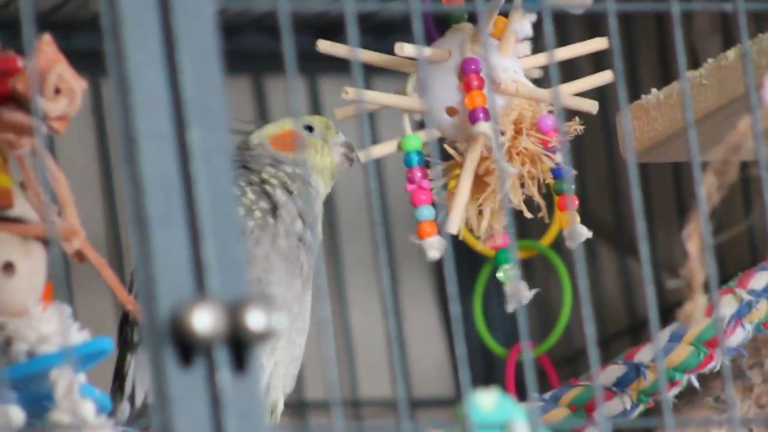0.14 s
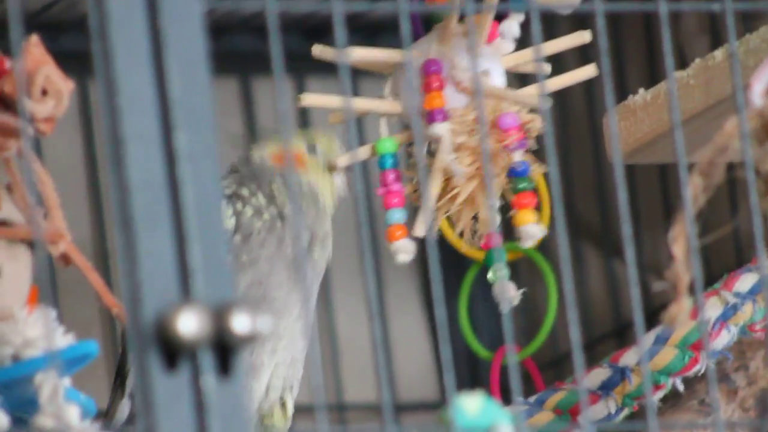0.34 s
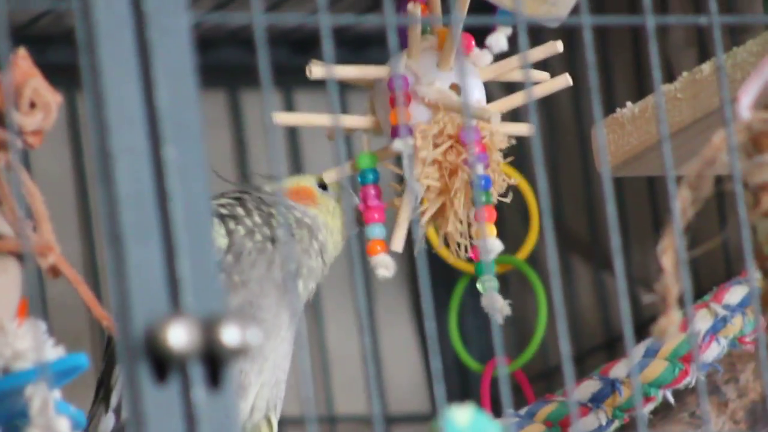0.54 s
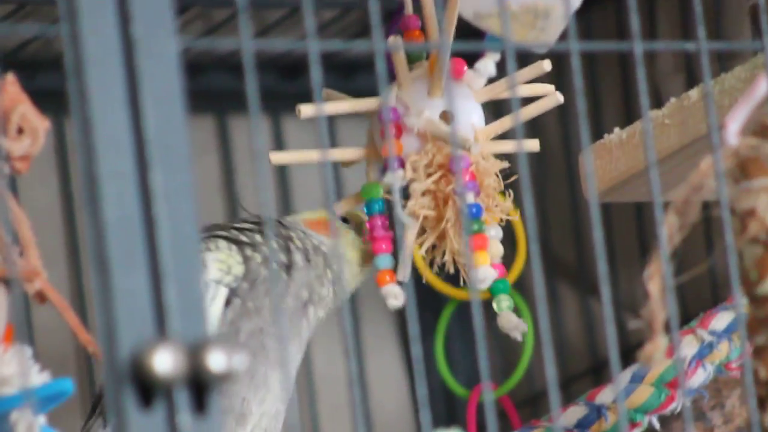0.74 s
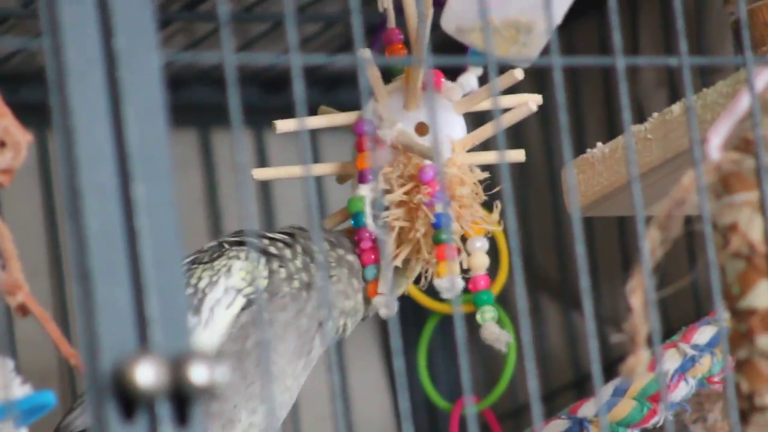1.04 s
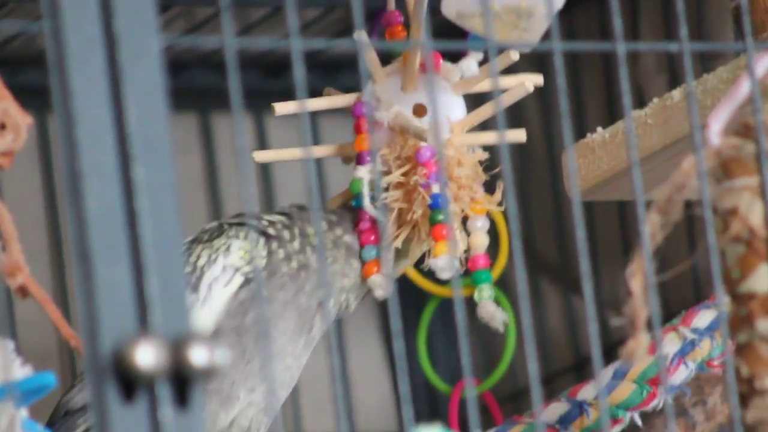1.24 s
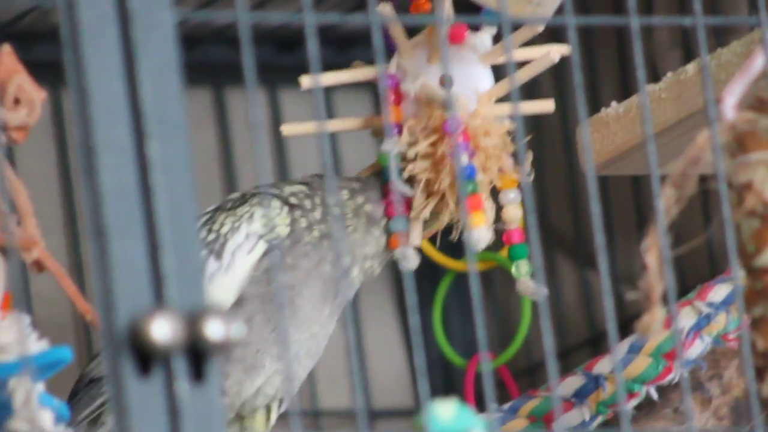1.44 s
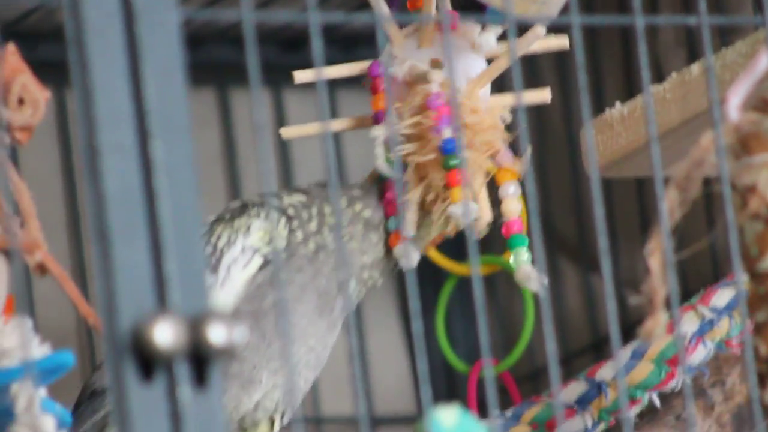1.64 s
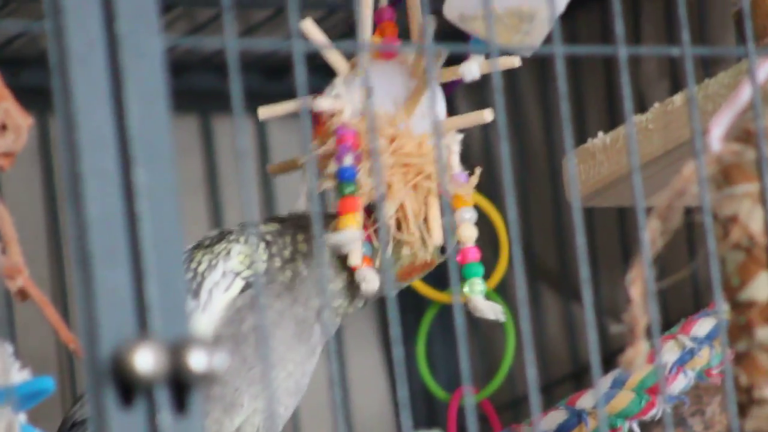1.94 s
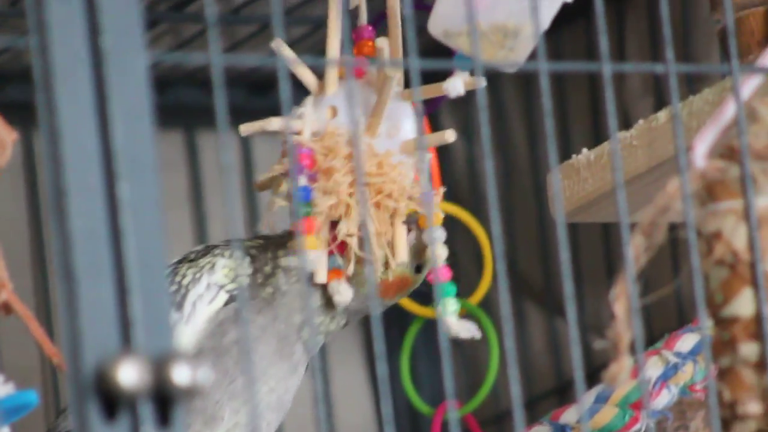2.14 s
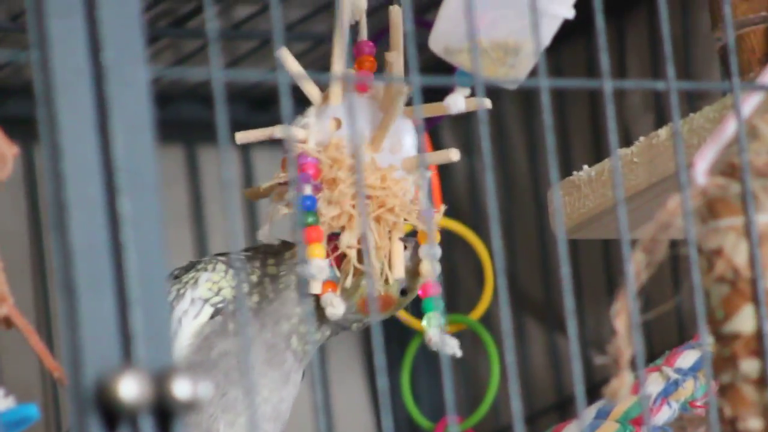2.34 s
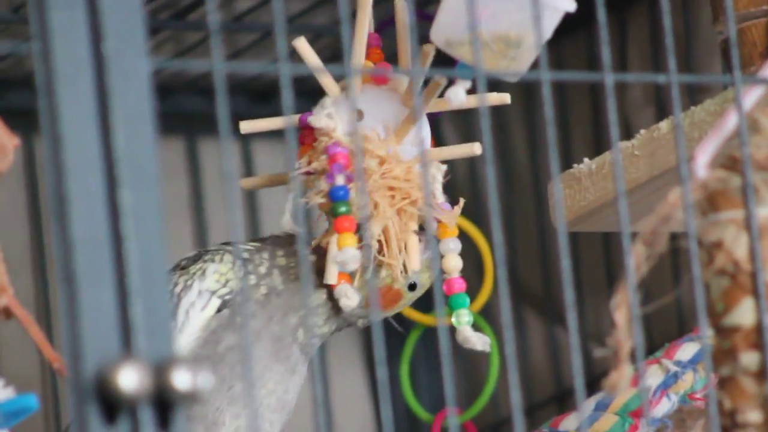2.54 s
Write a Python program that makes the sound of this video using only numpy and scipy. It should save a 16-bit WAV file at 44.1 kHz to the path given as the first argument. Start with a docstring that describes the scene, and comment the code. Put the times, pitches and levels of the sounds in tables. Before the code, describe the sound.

A cockatiel chirps loudly and close in a furnished room: several buzzy notes flip into bright rising whistles, with pauses between, then one thinner, higher chirp. A low steady fan hum with a faint whine stays underneath.

```python
"""Cockatiel in a furnished room

A cockatiel chirps: most chirps have a few hoarse, buzzy notes and slide into a whistle.
The whistles are tones with two overtones; the hoarse notes are jittery stacks of partials, filtered.
The room smears both into short tails of fading noise. Behind them an appliance fan hums as
shaped noise with a thin whine, and a screen whistles faintly; both are gently wandering sines."""
import sys
import numpy as np
from scipy import signal
from scipy.fft import rfft, irfft
from scipy.io import wavfile

SR = 44100
rng = np.random.default_rng(int(sys.argv[2]) if len(sys.argv) > 2 else 0)


def transcribe(signal):
    """Save signal, clipped to [-1, 1], as a 16-bit WAV file at the path in sys.argv[1]."""
    frames = np.atleast_2d(signal).T
    limited = np.clip(frames, -1, 1)
    pcm = np.round(limited * 32767).astype(np.int16)
    wavfile.write(sys.argv[1], SR, pcm)


N = 119070


def from_db(db):
    """Turns decibels into a plain gain."""
    return 10 ** (np.asarray(db) / 20)


def at_hz(points, hz):
    """Reads a table between its points, along a log-frequency axis."""
    table = np.array(points)
    return np.interp(np.log(hz + 1), np.log(table[:, 0]), table[:, 1])


def drift(rate_hz, size):
    """Slow random wander with a spread of 1: noise smoothed by a two-pole low-pass."""
    r = np.exp(-2 * np.pi * rate_hz / SR)
    slow = signal.lfilter([1], [1, -2 * r, r * r], rng.standard_normal(size))
    return (slow - slow.mean()) / slow.std()


def band_pass(x, low_hz, high_hz):
    """Keeps only the sound between two frequencies."""
    return signal.sosfilt(signal.butter(2, [low_hz, high_hz], "band", fs=SR, output="sos"), x)


# Spectrum of the fan's air noise, before its overall level is set: f/Hz, relative level per Hz/dB
FAN_SPECTRUM = [(21, -61), (35, -33), (135, -7), (213, -8), (283, 0.5), (364, -3.5), (436, -5), (782, -9.5),
                (889, -9), (1010, -14), (1300, -9.5), (2400, -14.5), (2870, -15.5), (5420, -22.5),
                (12200, -46.5), (15400, -51)]
# Duct resonances that lift this spectrum: f/Hz, width/Hz, boost/dB
DUCT_PEAKS = [(161, 7.1, 10), (285.4, 29.4, 5.5), (442, 11.7, 10), (910, 15, 3.5)]
FAN_DB = -37   # rms


def fan():
    """Steady airflow noise, made louder where the duct resonates."""
    hz = np.fft.rfftfreq(N, 1 / SR)
    db = at_hz(FAN_SPECTRUM, hz)
    for peak_hz, width_hz, boost_db in DUCT_PEAKS:
        db = db + boost_db / (1 + (2 * (hz - peak_hz) / width_hz) ** 2)
    air = irfft(rfft(rng.standard_normal(N)) * from_db(db), N)
    return from_db(FAN_DB) * air / air.std()


# Thin tones, first the fan's whine and then the screen's whistle: f/Hz, rms level/dB, wander/Hz
# (in the order f, level, wander)
WHINE_TONES = [(1271.3, -46, 2.84), (15734, -64, 1)]
WHINE_WANDER_HZ = 3.4   # how fast the pitch wanders


def whines():
    """Steady sine tones whose pitch wanders slightly."""
    out = np.zeros(N)
    for tone_hz, db, wander_hz in WHINE_TONES:
        hz = tone_hz + wander_hz * drift(WHINE_WANDER_HZ, N)
        out += np.sqrt(2) * from_db(db) * np.sin(2 * np.pi * np.cumsum(hz) / SR)
    return out


# How long the room takes to fade by 60 dB, before the early boost: f/Hz, fade time t/s
ROOM_FADE = [(2000, 0.42), (4000, 0.36), (6500, 0.34), (10000, 0.33), (14000, 0.35)]
DIRECT_CUT_DB, FIRST_ECHO_S = 7, .0015   # direct sound is turned down; the tail starts a little later
EARLY_DB, EARLY_S = 5, 0.0081            # extra level early in the tail, and how fast it goes


def room(x):
    """Direct sound plus a dense noise-like tail, whose frequency bands die away at different speeds."""
    t = np.arange(SR // 2) / SR
    tail = np.zeros(len(t))
    white = rng.standard_normal(len(t))
    edges_hz = [800, 2000, 3200, 5000, 8000, 12000, 18000]
    for low, high in zip(edges_hz, edges_hz[1:]):
        fade_s = at_hz(ROOM_FADE, np.sqrt(low * high))
        tail += band_pass(white, low, high) * from_db(-60 * t / fade_s)
    tail = tail * (t > FIRST_ECHO_S) * from_db(EARLY_DB * np.exp(-t / EARLY_S))
    tail = tail / np.sqrt(np.sum(tail ** 2) / 2)   # total energy 2
    return from_db(-DIRECT_CUT_DB) * x + signal.fftconvolve(x, tail)[:len(x)]


RELEASE_S = 0.0032


def fades(t, start, end, attack_s):
    """Soft onset, and a soft offset that begins at the end time."""
    rise = np.clip((t - start) / attack_s, 0, 1) ** 2
    fall = np.clip((end - t) / RELEASE_S + 1, 0, 1) ** 2
    return rise * fall


JITTER, JITTER_HZ = .075, 200                # pitch scatter (share) at roughness 1, and its speed
BREATH_DB = 2                                # breath against the partials, at roughness 1
LOW_THROAT_HZ, LOW_HALF_WIDTH_HZ = 2380, 645
BEAK_WIDTH_HZ = 1000
RASP_FLOOR_DB, RASP_TOP_HZ = -26.5, 12900    # weak sound above the throat resonance, and where it falls off
# Hoarse notes, with levels before fades and room: start t/s, length/s, attack/s, f at start/Hz,
# f at end/Hz, level/dB, throat resonance f/Hz, its width/Hz, low throat resonance level/dB,
# beak resonance f/Hz, its level/dB, roughness/0-1 (resonance levels are against the throat's)
HOARSE_NOTES = [(0.095, 0.038, 0.017, 2400, 2380, -21.5, 5220, 3300, -35, 12800, -14, 0.75),
                (0.116, 0.053, 0.0094, 1573, 1559, -17, 5470, 1610, -38, 12100, -22, 0.44),
                (0.505, 0.027, 0.0079, 5000, 5320, -27, 5040, 2000, -30, 10700, -3.5, 0.33),
                (0.519, .04, 0.0064, 2390, 2244, -22, 5440, 2900, -10, 9960, -7, 0.46),
                (0.541, 0.041, 0.0045, 1742, 1690, -17.5, 5480, 1730, -33, 10800, -17, 0.81),
                (0.567, 0.04, 0.0056, 2196, 2033, -31, 6450, 2000, 4, 8500, -19, 0.39),
                (0.59, 0.031, 0.0053, 2534, 3085, -35, 5400, 2000, -1, 10800, -26, 0.53),
                (1.121, 0.033, 0.0074, 1894, 1884, -23, 5350, 2040, -33, 11650, -3.5, 0.53),
                (1.145, 0.033, 0.0075, 1368, 1326, -20, 4600, 2480, -13, 12200, -30, 0.77),
                (1.179, 0.023, 0.0071, 1276, 1212, -19.5, 4470, 2440, -38, 11800, -15, 0.75),
                (1.191, 0.022, 0.004, 2850, 3060, -31.5, 3000, 1500, -9, 7160, -1, 0.65),
                (1.344, .058, 0.023, 2319, 2127, -23.5, 5580, 3390, -5, 9850, -2.5, 0.39),
                (1.408, .045, 0.0086, 2540, 3203, -23.5, 5230, 2040, -5.5, 11400, -11, 0.69),
                (1.46, 0.025, 0.008, 2477, 2510, -34.5, 2430, 1500, -5, 10100, -7, 0.2),
                (2.226, 0.051, 0.016, 1739, 1683, -30.5, 4960, 4480, -11, 8500, -16, 0.17),
                (2.271, 0.032, 0.0065, 1776, 2052, -31, 3970, 1580, -3, 7500, 2, 0.4)]


def throat_and_beak(hz, throat_hz, width_hz, low_db, beak_hz, beak_db):
    """Gain at each frequency: throat, low throat and beak resonances over a weak floor."""
    throat = 1 / (1 + (2 * (hz - throat_hz) / width_hz) ** 4)
    low_throat = from_db(low_db) / (1 + ((hz - LOW_THROAT_HZ) / LOW_HALF_WIDTH_HZ) ** 4)
    beak = from_db(beak_db) / (1 + (2 * (hz - beak_hz) / BEAK_WIDTH_HZ) ** 2)
    floor = from_db(RASP_FLOOR_DB) * (hz > throat_hz) / (1 + (hz / RASP_TOP_HZ) ** 8)
    return throat + low_throat + beak + floor


def rasps(t):
    """A jittery stack of equal partials plus breath, coloured by throat and beak."""
    out = np.zeros(len(t))
    jitter = drift(JITTER_HZ, len(t))
    white = rng.standard_normal(len(t))
    for (start, length, attack_s, hz0, hz1, db,
         throat_hz, width_hz, low_db, beak_hz, beak_db, rough) in HOARSE_NOTES:
        end = start + length
        on = (t > start) & (t < end + RELEASE_S)
        rough = np.clip(rough, 0, 1)
        pitch_hz = np.interp(t[on], [start, end], [hz0, hz1]) * (1 + JITTER * rough * jitter[on])
        phase = 2 * np.pi * np.cumsum(pitch_hz) / SR
        pulses = sum(np.cos(k * phase) for k in range(1, int(16000 / hz0) + 1))
        source = pulses / pulses.std() + from_db(BREATH_DB) * rough * white[on]
        hz = np.fft.rfftfreq(on.sum(), 1 / SR)
        colour = throat_and_beak(hz, throat_hz, width_hz, low_db, beak_hz, beak_db)
        note = irfft(rfft(source) * colour, on.sum())
        out[on] += from_db(db) * note / note.std() * fades(t[on], start, end, attack_s)
    return out


ATTACK_S = 0.002
WOBBLE_HZ = 220                       # speed of the pitch scatter
RAGGED_START, SETTLE_S = 6.0, .03     # extra scatter at the start (times the settled one), settling time
WHISTLE_BREATH_DB = -33
# One curve per whistle, with levels before fades and room: t/s, f/Hz, level/dB,
# 2nd partial level/dB, 3rd partial level/dB (partials against the first)
WHISTLE_CURVES = [
    [(-.16, 3400, -37, -23, -30), (-.12, 3350, -8, -14, -39), (-.09, 3800, -24.5, -18, -19),
     (-.06, 4080, -17.5, -3, -13), (-.045, 4270, -28.5, -9, -24)],
    [(.142, 2443, -39, -12, -20), (.165, 2520, -29, -14, -24), (.178, 3084, -25, -16, -26),
     (.188, 3492, -14, -21, -46), (.218, 3347, -12, -26, -37), (.24, 3820, -15, -10, -21),
     (.265, 4212, -19, -7.5, -19), (.29, 4254, -14, -14, -32), (.305, 4070, -48, -29, -28)],
    [(.553, 4500, -42, -5, -20), (.58, 4290, -29.5, -3, -13), (.61, 3670, -25, -3, -24),
     (.632, 3353, -9.5, -26, -45), (.645, 3263, -13, -16, -47), (.653, 3820, -18, -8, -16),
     (.67, 4063, -17.5, -9, -16.5), (.69, 4181, -17, -21, -24), (.715, 4297, -17.5, -7.5, -24)],
    [(1.089, 3850, -30, -18, -16), (1.099, 3610, -21, -13.5, -25), (1.117, 3565, -15, -22, -22),
     (1.128, 3654, -20, -4.5, -13)],
    [(1.203, 3816, -43, -16, -30), (1.215, 3720, -19, -14, -40), (1.23, 3560, -15, -34, -48)],
    [(1.4, 4250, -28.5, -12, -14), (1.43, 3990, -27.5, 0, -11), (1.45, 3580, -14, -22, -26),
     (1.472, 3645, -22, -0.5, -20), (1.49, 4230, -14, -15, -19), (1.512, 4343, -16, -15, -27),
     (1.526, 4435, -22.5, -8, -20)],
    [(2.262, 5200, -38, -5, -40), (2.285, 5460, -33, -16, -40), (2.303, 5660, -19, -20.5, -45),
     (2.318, 5897, -18, -7, -45), (2.332, 6110, -12, -12.5, -45), (2.345, 6230, -18, -30, -45)],
]
# Pitch scatter of each whistle once it has settled: one value each [share of f]
SETTLED_WOBBLE = [.008, .007, .011, .0007, .002, .007, .016]


def whistles(t):
    """A tone with two overtones and a little breath; its pitch starts ragged, then settles."""
    out = np.zeros(len(t))
    wobble = drift(WOBBLE_HZ, len(t))
    breath = band_pass(rng.standard_normal(len(t)), 2500, 12000)
    for rows, share in zip(WHISTLE_CURVES, SETTLED_WOBBLE):
        s, *columns = np.transpose(rows)
        start, end = s[0], s[-1]
        on = (t > start) & (t < end + RELEASE_S)
        hz, db, second_db, third_db = [np.interp(t[on], s, c) for c in columns]
        scatter = share * (1 + RAGGED_START * np.exp((start - t[on]) / SETTLE_S))
        phase = 2 * np.pi * np.cumsum(hz * (1 + scatter * wobble[on])) / SR
        tone = np.sin(phase)
        tone += from_db(second_db) * np.sin(2 * phase)
        tone += from_db(third_db) * np.sin(3 * phase)
        # the breath swells and fades with each cycle of the tone
        tone += from_db(WHISTLE_BREATH_DB) * breath[on] * (1 + np.sin(phase))
        out[on] += np.sqrt(2) * tone * from_db(db) * fades(t[on], start, end, ATTACK_S)
    return out


LEAD_S = .2   # the bird starts before time 0, so a chirp can already be under way


def scene():
    """The bird in the room, over the fan and the thin tones."""
    lead = int(LEAD_S * SR)
    t = (np.arange(N + lead) - lead) / SR
    bird = room(whistles(t) + rasps(t))[lead:]
    return (bird + fan() + whines())[None]


CUTOFF_HZ = 15830


def record(dry):
    """Cuts the top of the treble steeply with an elliptic low-pass."""
    return signal.sosfilt(signal.ellip(12, .5, 80, CUTOFF_HZ, fs=SR, output="sos"), dry)


dry = scene()
out = record(dry)
transcribe(out)
```